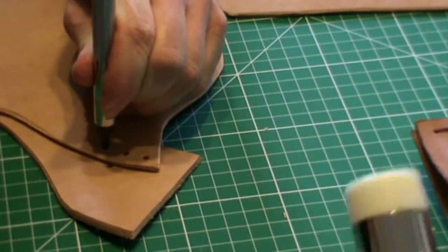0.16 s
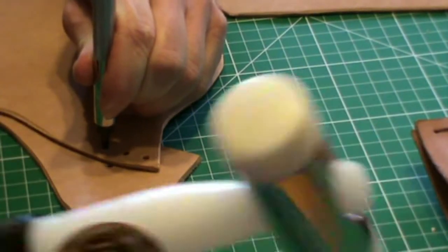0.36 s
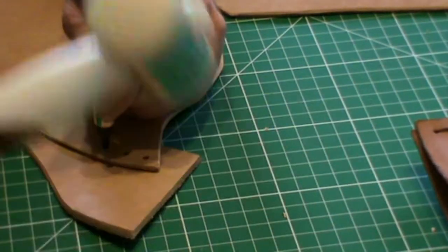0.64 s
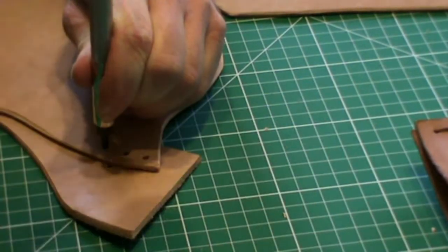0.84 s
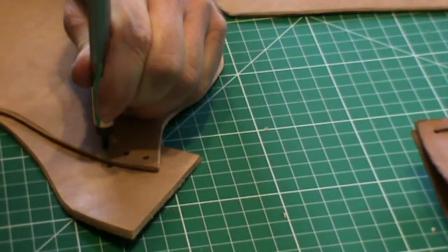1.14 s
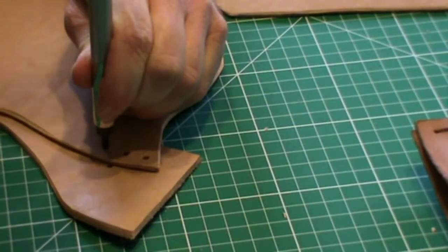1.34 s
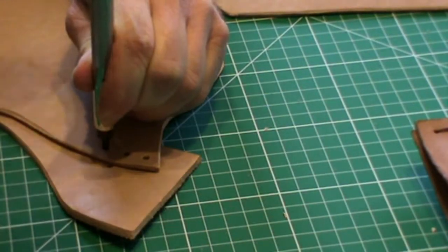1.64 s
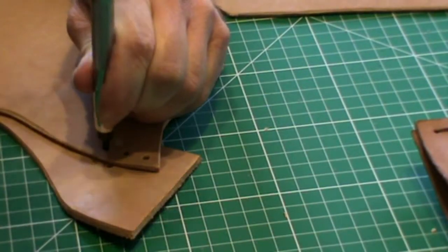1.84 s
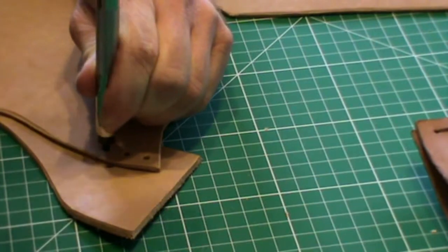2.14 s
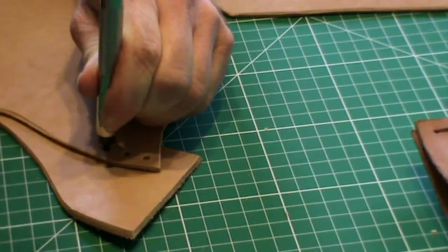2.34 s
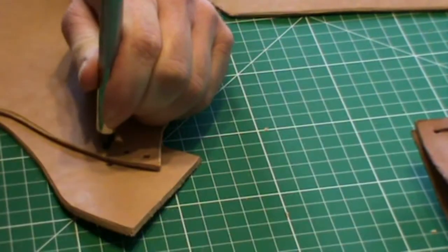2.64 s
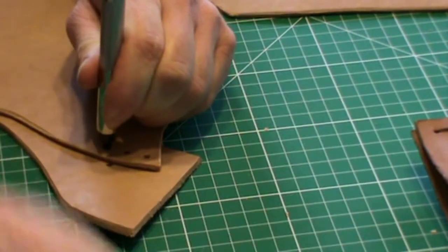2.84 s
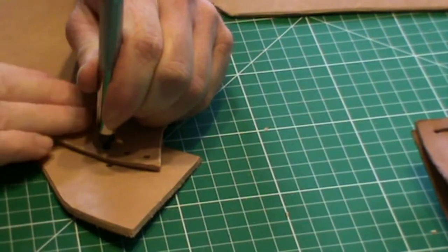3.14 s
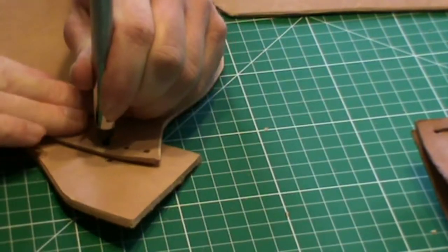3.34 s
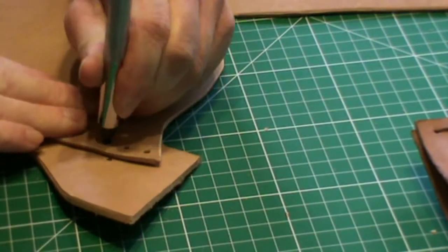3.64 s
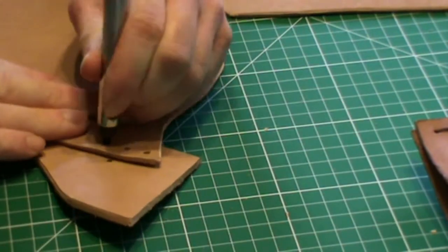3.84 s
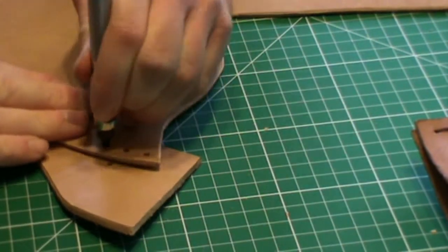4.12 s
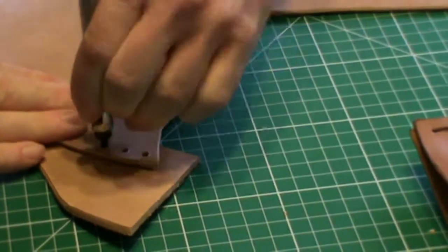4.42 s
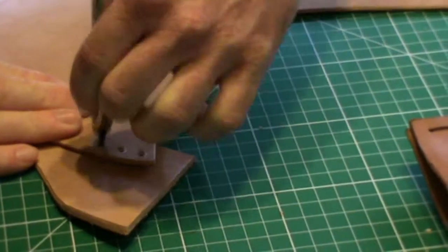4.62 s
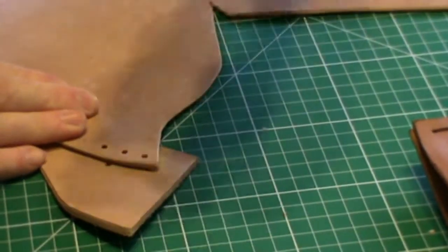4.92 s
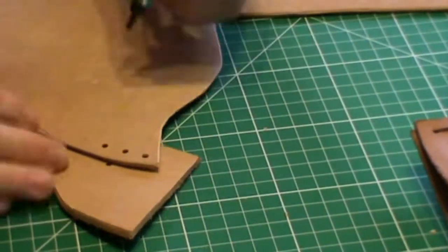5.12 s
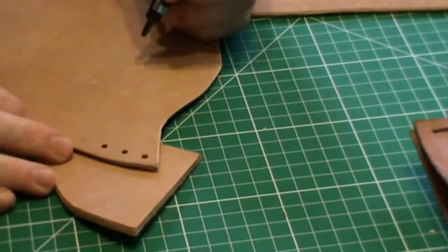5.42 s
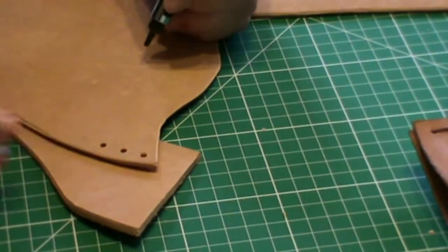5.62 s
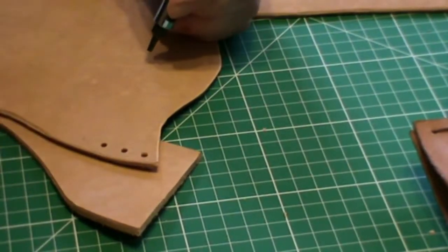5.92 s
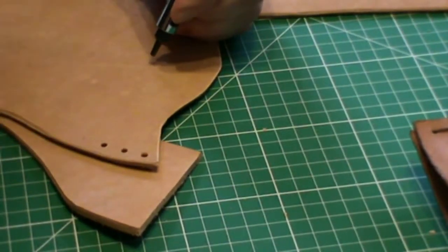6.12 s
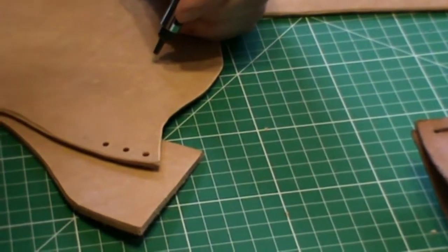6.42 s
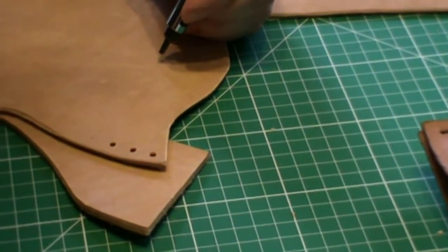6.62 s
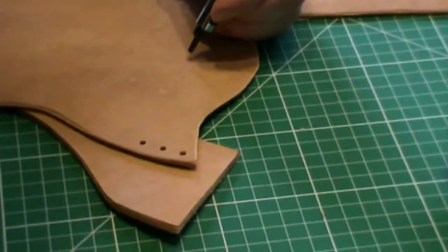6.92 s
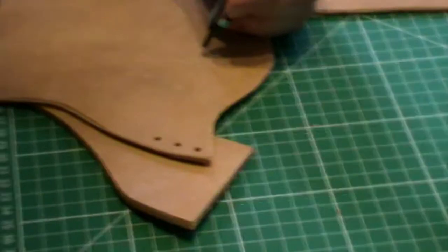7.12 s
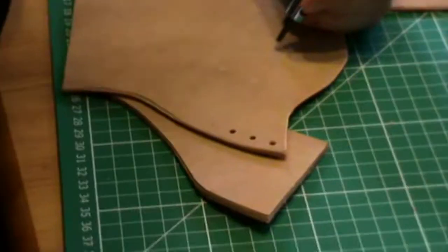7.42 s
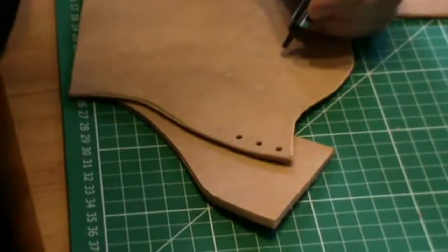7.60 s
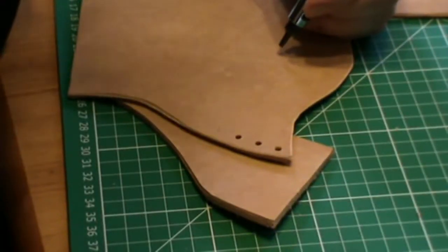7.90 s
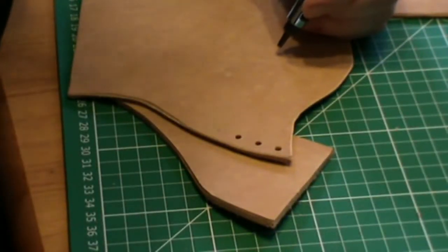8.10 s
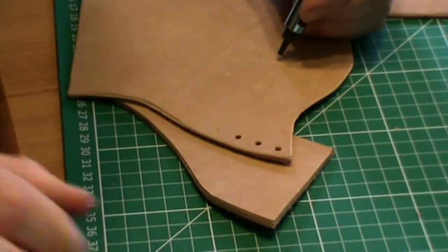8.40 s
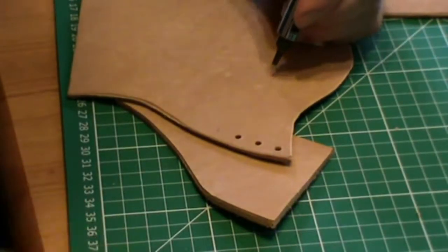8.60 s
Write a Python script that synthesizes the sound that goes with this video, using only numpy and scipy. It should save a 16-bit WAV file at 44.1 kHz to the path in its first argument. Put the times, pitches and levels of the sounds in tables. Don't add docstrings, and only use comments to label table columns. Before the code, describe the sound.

Close to the microphone in a small hard room, a faint scrape and knock lead to three loud, accelerating mallet blows on a steel punch, each a bright crack with a woody bench thump and short tail. The handle knocks down, the punch creaks loose in quick snaps, a steel tool clinks and rings, then a stand bumps, rattles and settles over faint motor hum and hiss.

```python
import sys
import numpy as np
from scipy import signal
from scipy.io import wavfile
from scipy.ndimage import uniform_filter1d, minimum_filter1d

SR = 44100
rng = np.random.default_rng(int(sys.argv[2]) if len(sys.argv) > 2 else 0)


def gain_from_db(level_db):
    decades = np.asarray(level_db, float) / 20
    return 10 ** decades


def store_pcm(level_fs):
    pcm = np.round(np.clip(level_fs, -1, 1) * 32767).astype(np.int16)
    wavfile.write(sys.argv[1], SR, np.atleast_2d(pcm).T)


N = 385864

# (time [s], body and room level [dB], contact tick level [dB], bass level [dB])
HAMMER_BLOWS = [
    (1.4114, -4, 0.5, -7),
    (1.7444, -0.5, 1, -11),
    (2.0286, 0, 8, -10.5),
]
HAMMER_LAID = [
    (2.694, -6, -5, -15),
    (2.768, -2, -7, -19.5),
]
TOOL_DROP = [
    (6.136, -24, -14, -34),
    (6.170, -32.5, -22, -59),
]
BENCH_KNOCKS = [
    (0.084, -40, -70, -70),
    (0.101, -46, -68, -71),
    (1.016, -23, -39, -29.5),
    (1.063, -37.5, -37, -45.5),
    (4.646, -33, -37, -64),
    (6.568, -46, -70, -49),
    (6.647, -36.5, -70, -50),
    (7.766, -54, -44, -76),
    (8.618, -35, -57, -39),
    (8.629, -30, -55, -33),
]
STAND_JOLTS = [(7.118, -14, -45, -28), (7.123, -12, -42, -24), (7.186, -16.5, -60, -35),
               (7.195, -11, -45, -24), (7.216, -11.5, -22, -42), (7.257, -17, -37, -27),
               (7.279, -13.5, -40, -25), (7.300, -15.5, -45, -33), (7.311, -13, -41, -31),
               (7.35, -50, -18, -32), (7.408, -12.5, -23, -45), (7.477, -40, -43, -50),
               (7.66, -36.5, -55, -43)]
FOOT_NUDGES = [
    (6.716, -28, -60, -43),
    (6.752, -22, -55, -43),
    (6.774, -11, -60, -39),
    (6.786, -11, -50, -35),
    (6.812, -23, -50, -44),
    (6.859, -45, -60, -50),
    (7.046, -16, -60, -42),
    (7.057, -13, -60, -43),
]
CATCH_CLICKS = [
    (4.6455, -52, -18, -60),
    (7.056, -60, -53.5, -70),
    (7.112, -60, -70, -80),
    (7.122, -40, -50, -53),
    (7.179, -62, -54, -60),
    (7.194, -39, -48, -54),
]
PUNCH_FLICKS = [
    (4.991, -67, -54, -80),
    (5.004, -78, -58, -80),
    (5.018, -61, -36, -79),
    (5.075, -69, -65, -85),
]
JOINT_TICKS = [
    (6.577, -63, -42, -80),
    (6.778, -56, -34, -78),
    (6.822, -65, -36, -80),
    (6.745, -58, -45, -80),
    (6.7545, -60, -31.5, -80),
    (6.789, -41, -32, -80),
    (6.8345, -65, -25, -80),
    (7.055, -57, -44, -80),
]
PIN_PINGS = [
    (7.054, -63, -48, -80),
    (7.124, -56, -29, -80),
    (7.194, -52, -34, -80),
    (7.217, -66, -29, -78),
    (7.41, -58, -36, -80),
]
CLIP_PLUCKS = [
    (7.1105, -66, -14, -90),
    (7.179, -68, -30, -90),
]
NAIL_TAPS = [
    (8.6148, -51, -23.5, -80),
    (8.628, -58, -32, -80),
]
# (time [s], body and room level [dB], contact tick level [dB])
PUNCH_SNAPS = [(2.343, -48, -49), (2.3544, -50, -54), (2.3636, -49, -53), (2.468, -55, -58),
               (2.52, -61, -67), (2.7834, -39, -40), (4.1728, -32, -43), (4.1763, -9, -23),
               (4.2292, -11, -23.5), (4.255, -37, -40), (4.2644, -10, -22.5), (4.2858, -6.5, -23),
               (4.3011, -12, -22), (4.3149, -18, -23.5), (4.329, -10.5, -24.5), (4.343, -12, -24.5),
               (4.4125, -10.5, -26.5), (4.4225, -34, -42), (4.4313, -11.5, -25.5), (4.4475, -20, -30),
               (4.4891, -13, -27), (4.522, -13.5, -29.5), (4.531, -31, -42), (4.5383, -17, -33),
               (4.552, -25, -35), (4.5688, -14.5, -34), (4.579, -31, -38), (4.585, -19, -41.5),
               (4.6087, -20, -30), (4.6318, -35, -38.5), (4.99, -32, -55), (5.018, -34, -44),
               (5.125, -29, -53.5), (5.534, -29, -52)]

# (start [s], peak [s], end [s], peak level [dB], end level [dB])
HEAD_SCRAPES = [
    (.228, .238, 0.27, -54, -74),
    (.28, .33, 0.74, -49.5, -61),
]
HEAD_SINGING = [
    (.28, .38, 0.62, -59, -72),
]
MAT_SLIDES = [
    (3.95, 4.17, 4.8, -35, -49),
    (4.69, 4.7, 30, -43.5, -69),
    (6.44, 6.45, 8.9, -51, -68),
    (7.15, 7.23, 7.5, -17, -38),
]
SLEEVE_BRUSHES = [
    (5.1, 5.13, 5.2, -65, -71),
    (5.545, 5.575, 5.1, -58, -56),
]
STAND_ROLL = [
    (7.52, 7.76, 8.34, -54, -61),
]
STAND_CREAK = [
    (8.11, 8.13, 8.47, -51, -65),
]
MOTOR_LOUDER = [
    (7.5, 7.6, 8.6, -20, -20),
]

# (frequency [Hz], level [dB])
BENCH_COLOURS = [
    [(40, -25), (69, -11), (96, -13), (194, -3), (329, -5), (918, -1.5), (1150, -4.5), (1630, 2),
     (2570, -11), (3050, -6.5), (3700, -24.5), (5200, -27.5), (10200, -34), (12500, -30.5), (16000, -104)],
    [(40, -30), (69, 0.5), (91, -22), (194, 6), (256, -1), (337, 3.5), (1180, -3.5), (1630, 3), (2500, -19),
     (3300, -12), (5310, -32), (10400, -36.5), (13100, -41), (16000, -106)],
    [(40, -32.5), (147, -4.5), (237, -13), (392, -4.5), (444, -10), (600, -4.5), (1210, -8), (1630, -5.5),
     (2500, -20.5), (3300, -21.5), (5580, -39.5), (9940, -32.5), (13400, -45), (16000, -106)],
]
HANDLE_COLOURS = [
    [(40, -52), (330, -21.5), (500, -10), (630, 1), (751, -2.5), (1100, -9.5), (1750, -52), (6020, -51.5),
     (14800, -73), (16000, -76)],
    [(40, -61.5), (81, -32), (159, 3.5), (243, -15.5), (320, 1.5), (556, -10.5), (615, 2.5), (733, -3),
     (810, 1), (1270, -6), (2000, -16), (3140, -25.5), (3930, -40.5), (8990, -42.5), (16000, -65)],
]
WOOD_COLOURS = [
    [(40, -39), (97, -26), (241, -23), (351, 2.5), (469, -17), (639, -3.5), (746, -8), (8000, -61),
     (10400, -86)],
    [(30, -38.5), (74, -29.5), (110, -1.5), (377, -9), (473, -6), (560, -12), (930, -4.5), (1130, -27.5),
     (1460, -25.5), (12000, -74), (15600, -80)],
    [(40, -10), (103, 6), (243, -9.5), (339, 4), (650, -6), (854, -6), (5070, -29.5), (6000, -53),
     (7800, -48), (13200, -120)],
    [(40, -34), (136, -15), (306, -12.5), (372, -1.5), (476, -8), (899, -12.5), (2070, -28.5),
     (5130, -37.5), (14000, -52)],
]
LEATHER_COLOUR = [(59, -55), (100, -11), (224, 0.5), (302, -19), (481, -4.5), (872, -5), (1800, 4.5),
                  (3780, -3.5), (7290, -0.5), (16000, -4)]
STEEL_COLOUR = [(35, -47), (60, -26), (274, -34), (408, -17), (527, -35), (803, -14), (1090, -18),
                (1250, -8), (1740, -19.5), (3120, -7), (3950, -10), (4640, 0.5), (5210, -8), (12400, -22.5),
                (16000, -63)]
LEGS_COLOUR = [(25, -9), (92, -6), (363, -2), (545, -15), (863, -3), (1440, -13), (1700, -10), (5140, -18),
               (7510, -16.5), (14400, -34.5), (16000, -46)]
FEET_COLOUR = [(30, -1), (172, 4.5), (217, -5.5), (383, -3), (495, -11), (786, -15), (965, -9), (2140, -21),
               (14000, -44)]
CATCH_COLOUR = [(300, -15), (900, 0), (1900, -20), (3500, -4), (12000, -34)]
# (frequency [Hz], level [dB])
PLAIN_TICK = [(500, -25), (2000, -14), (4500, 0.5), (7500, -0.5), (12000, 2), (14000, 6), (16000, -12)]
FACE_TICK = [(290, -43.5), (500, 7.5), (1640, -7), (2390, -9), (3920, -2), (4940, -6), (5880, -27),
             (7980, -11.5), (11100, -12), (13400, -27), (16000, -56)]
HANDLE_TICK = [(500, -8), (1500, 1), (3400, -5), (4300, -8.5), (7000, -8.5), (11000, -7), (14000, -16),
               (16000, -40.5)]
JOINT_TICK = [(500, -30), (1600, 5), (2800, 5.5), (4200, -6), (6500, -6.5), (12000, -21), (16000, -35)]
NAIL_TICK = [(1500, -20), (4000, -4), (5500, -7), (8500, -6), (12000, -10), (14500, -25), (16000, -40)]

# (frequency [Hz], level [dB], decay by 60 dB [s])
BENCH_RING = [(115.6, -24.5, 0.31), (156.4, -14.5, 0.28), (201.9, -17, 0.36), (428, -25, 0.25),
              (664, -18, 0.14), (1457, -49, 0.05), (1625, -25.5, 0.044), (3040, -20.5, 0.0054)]
PLANK_RING = [(109.4, -31.5, 0.28), (334, -23, 0.11), (760, -30, .1), (306, -24.5, 0.098), (400, -25, 0.16),
              (522, -22, 0.17), (850, -28, 0.087), (922, -19, 0.09), (1055, -16.5, 0.057),
              (1297, -17.5, 0.091), (1494, -39, 0.13), (1680, -28, .06), (2120, -23, .04),
              (3280, -30, .025), (3900, -33, .03)]
HAMMER_RING = [(3220, -33, 0.0232), (4380, -31.5, 0.013), (9800, -33, 0.012), (3700, -28, .02),
               (4800, -44, 0.021), (6380, -37.5, 0.0086), (8230, -40.5, 0.0088), (10700, -57, 0.012)]
HANDLE_RING = [(353, -19.5, 0.032), (525, -10, 0.042), (637, -10.5, 0.059), (810, -23, 0.071),
               (960, -18, 0.055), (1078, -16, 0.08), (1234, -20, 0.054)]
PUNCH_RING = [(1585, -9.5, 0.048), (1770, -11, 0.049), (4670, -2.5, 0.018), (8100, -2, 0.0056),
              (12150, 1, 0.0042), (13600, -2, 0.0025)]
STEEL_RING = [(826, -18, 0.063), (2800, -26, .06), (3105, -13.5, 0.2), (3070, -25, .08), (4160, -29, 0.067),
              (4370, -18, 0.047), (4650, -14, 0.089), (4696, -13, 0.42), (4660, -18, 0.11),
              (5900, -20, 0.05), (6500, -18, .04), (7150, -12.5, 0.023), (7800, -13, 0.024),
              (12000, -16.5, 0.0046)]
LEG_RING = [(67, -24, 0.18), (103.6, -11, 0.076), (184, -7.5, 0.043), (831, -8.5, 0.039),
            (1830, -41, 0.018), (2150, -30, 0.022), (2780, -22, 0.018), (9050, -27, 0.064)]
CATCH_RING = [(1850, -1, 0.025), (2110, -9, 0.028), (2900, -19, 0.016)]
FLICK_RING = [(785, -19, .012), (1570, -1, 0.01), (1790, 3.5, 0.013), (3200, -12, 0.003)]
PIN_RING = [(830, 6, 0.036), (1820, -3, 0.041), (2120, 5, .035), (2730, -16, 0.023), (7100, -12.5, 0.014),
            (9100, -28, .06)]
CLIP_RING = [(1850, -2, .05), (2150, -7, .03)]
# (frequency [Hz], width [Hz], level [dB])
HEAD_RESONANCES = [(1220, 290, -4), (1580, 220, 4), (2205, 120, 5), (3200, 290, 0), (4400, 120, -9)]

# (frequency [Hz], decay by 60 dB [s])
TAIL_DECAY = [(40, 0.058), (120, 0.6), (400, 0.5), (1100, 0.5), (3000, 0.53), (7000, 0.48), (12500, 0.33),
              (14000, 0.26), (15800, 0.18)]
# (frequency [Hz], likeness [0 to 1])
ROOM_LIKENESS = [(30, 0.6), (70, 1), (150, 0.96), (380, 0.65), (950, 0.12), (2380, 0.2), (5980, 0.22),
                 (15000, 0.83)]
# (frequency [Hz], level [dB])
ROOM_LEAN = [(60, -0.5), (180, 0), (550, -2), (1650, -3.5), (4970, -1), (15000, 2.5)]
# (frequency [Hz], level [dB])
HISS_COLOUR = [(25, 8), (45, -12.5), (149, -3), (242, -7.5), (451, -6), (545, -4), (695, -7), (962, -2.5),
               (1160, -8.5), (1370, -7), (2220, -8), (3820, -16), (16000, -23.5)]
# (frequency [Hz], likeness [0 to 1])
HISS_LIKENESS = [(30, 0.84), (70, 0.77), (180, 0.99), (550, 0.48), (1650, -0.0), (4970, 0.12),
                 (15000, 0.88)]
# (multiple of the turn rate, level [dB])
MOTOR_HUM = [(4, -69), (5, -67), (6, -69.5), (7, -70), (8, -68), (9, -75), (10, -68), (11, -65), (12, -67),
             (13, -71.5), (104, -81)]


def evened(x):
    return x / np.sqrt(np.mean(x ** 2) + 1e-20)


def read(points, hz):
    f, value = np.transpose(points)
    return np.interp(np.log(hz + 1), np.log(f + 1), value)


def noise(size, likeness, db, frame=512):
    hz = np.fft.rfftfreq(frame, 1 / SR)[:, None]
    t = np.arange(size * 4 // frame + 5) * frame / 4 / SR
    a, b, c, d = rng.standard_normal((len(t), len(hz), 4)).T
    alike = np.clip(read(likeness, hz), -1, 1)
    left = a + 1j * b
    right = alike * left + np.sqrt(1 - alike ** 2) * (c + 1j * d)
    bins = np.array([left, right]) * gain_from_db(db(hz, t))
    return signal.istft(bins, nperseg=frame, noverlap=frame * 3 // 4)[1][:, :size]


def click(db, size=4096):
    hz = abs(np.fft.fftfreq(size, 1 / SR))
    log_gain = np.log(gain_from_db(np.maximum(db(hz), -100)))
    phase = -signal.hilbert(log_gain).imag
    pulse = np.fft.ifft(np.exp(log_gain + 1j * phase)).real[:size // 2]
    return pulse / np.linalg.norm(pulse)


def resonate(x, hz, width_hz):
    return signal.lfilter(*signal.iirpeak(hz, hz / width_hz, SR), x)


def sides(db):
    return gain_from_db(np.array([[db / 2], [-db / 2]]))


def thinned(x, hz):
    return signal.sosfilt(signal.butter(2, hz, "high", fs=SR, output="sos"), x)


def level(rows):
    t = np.arange(N) / SR
    swell_db = 15.5
    gain = 0
    for start, peak, end, db, end_db in rows:
        gain = gain + gain_from_db(np.interp(t, (start, peak, end), (db - swell_db, db, end_db), -150, -150))
    return gain


def ringing(modes, scatter):
    t = np.arange(SR // 2) / SR
    out = np.zeros(len(t))
    for hz, db, t60 in modes:
        detune, strength_db = scatter * rng.uniform(-1, 1, 2) * [.012, 5]
        ring = gain_from_db(-60 * t / t60) * np.sin(2 * np.pi * hz * (1 + detune) * t)
        out += gain_from_db(db + strength_db) * ring / np.linalg.norm(ring)
    return out


def body_thud(colour, pitch, bass_lift_db, band_count):
    bands_db = 2.2 * rng.standard_normal(band_count)
    bands_hz = np.linspace(0, SR / 2, band_count)

    def db(hz):
        bass = bass_lift_db / (1 + (hz / 170) ** 4)
        rumble_cut = 14 / (1 + (hz / 60) ** 4)
        return read(colour, hz / pitch) + np.interp(hz, bands_hz, bands_db) + bass - rumble_cut

    return click(db)


def room_echoes(rise_s, near_db, near_s):
    t = np.arange(SR * 3 // 5) / SR

    def tail_db(hz, u):
        return -60 * u / read(TAIL_DECAY, hz) + np.multiply.outer([.5, -.5], read(ROOM_LEAN, hz))

    echoes = noise(len(t), ROOM_LIKENESS, tail_db)
    echoes /= np.sqrt(np.mean(echoes[:, :2000] ** 2))
    echoes += gain_from_db(near_db) * np.exp(-t / near_s) * rng.standard_normal(len(t))
    return echoes * (1 - np.exp(-t / rise_s)) ** 2


def contact_tick(colour, pitch, fade_s, rise_s):
    t = np.arange(301) / SR
    grit = rng.standard_normal(300) * np.exp(-t[:300] / fade_s) * (1 - np.exp(-t[1:] / rise_s))
    tick = np.convolve(grit, click(lambda hz: read(colour, hz / pitch), size=256))
    return tick / abs(tick).max()


def strikes(rows, colours, modes, tick_colour=PLAIN_TICK, body_db=0., tick_db=0., shelf_db=14.5,
            rise_s=.004, near_db=6., near_s=0.009, scatter=1, wet_db=0., tick_ring_db=-48.0,
            tick_s=0.00057, pitches=1, pans_db=0, lag_size=40, tick_rise_s=0.00002, band_count=90):
    out = np.zeros((2, N + SR))
    pitches = np.resize(pitches, len(rows))
    pans_db = np.resize(pans_db, len(rows))
    for row, colour, pitch, pan_db in zip(rows, colours * len(rows), pitches, pans_db):
        s, db, contact_db, bass_db = row
        rung = ringing(modes, scatter)
        thud = body_thud(colour, pitch, bass_db - db + shelf_db, band_count)
        pulse = np.pad(thud, (0, len(rung) - len(thud))) + gain_from_db(wet_db) * rung
        echoes = room_echoes(rise_s, near_db, near_s)
        size = echoes.shape[1]
        sound = gain_from_db(db + body_db) * signal.fftconvolve(pulse[None], echoes, axes=1)[:, :size]
        tick = contact_tick(tick_colour, pitch, tick_s, tick_rise_s)
        sound[:, :len(tick)] += gain_from_db(contact_db + tick_db) * tick
        sound[:, lag_size:lag_size + len(rung)] += gain_from_db(contact_db + tick_ring_db) * rung
        out[:, round((s + .0008) * SR):][:, :size] += sound * sides(pan_db)
    return out[:, :N]


def rubbing():
    rough = gain_from_db(np.minimum(2.2 * evened(uniform_filter1d(rng.standard_normal(N), 500)), 2.5))

    def db(hz, t):
        return read(LEGS_COLOUR, hz) + 0.086 * np.log2(hz / 1000 + .02) + 0 * t

    return evened(noise(N, ROOM_LIKENESS, db) * rough)


def camera():
    t = np.arange(N) / SR
    motor_hz, hiss_db, gain_db = 49.64, -58.5, 2.5
    hiss = evened(noise(N, HISS_LIKENESS, lambda hz, u: read(HISS_COLOUR, hz) + 0 * u, frame=2048))
    hum = 0
    for multiple, db in MOTOR_HUM:
        hum = hum + gain_from_db(db + gain_db) * np.sin(2 * np.pi * (multiple * motor_hz * t + rng.random()))
    pawl = np.diff(np.floor(t * motor_hz / 2 + 0.2), prepend=0) * gain_from_db(1.8 * rng.standard_normal(N))
    pawl_ring = resonate(resonate(pawl, 2030, 247), 2030, 247)
    return gain_from_db(hiss_db + gain_db) * hiss + hum + (gain_from_db(-24.5) + level(MOTOR_LOUDER)) * pawl_ring


def bench_knocks():
    woods = [WOOD_COLOURS[k] for k in (0, 0, 1, 1, 2, 1, 2, 2, 3, 3)]
    return strikes(BENCH_KNOCKS, woods, BENCH_RING[:3], FACE_TICK, body_db=-7.0, tick_db=2.5,
                   rise_s=0.0013, near_s=0.055, wet_db=-1.5, pitches=0.96, pans_db=-1.5)


def lifted_head(rub):
    head = 0.29 * rub
    for hz, width_hz, db in HEAD_RESONANCES:
        head = head + gain_from_db(db) * resonate(rub, hz, width_hz)
    singing = evened(resonate(rub, 4360, 130))
    return evened(head) * level(HEAD_SCRAPES) + singing * level(HEAD_SINGING)


def hammer_blows():
    return strikes(HAMMER_BLOWS, BENCH_COLOURS, BENCH_RING + PLANK_RING + HAMMER_RING, FACE_TICK,
                   rise_s=0.0011, tick_s=0.00058, tick_rise_s=0.0005, tick_ring_db=-25.0,
                   scatter=0.27, near_db=-6.5, near_s=0.0062, band_count=400, pans_db=-0.3)


def punch_snaps():
    bass_db = -47
    pitches = 0.96 + .007 * np.transpose(PUNCH_SNAPS)[2]
    snaps = strikes([(*row, bass_db) for row in PUNCH_SNAPS], [LEATHER_COLOUR], PUNCH_RING,
                    body_db=-28.0, tick_db=12.5, shelf_db=22.0, rise_s=0.0015, near_db=9.0,
                    near_s=0.0032, wet_db=-14.0, tick_ring_db=13.5, scatter=1 / 3, tick_s=0.00025,
                    pitches=pitches, pans_db=-0.1, lag_size=8)
    return thinned(snaps, hz=110)


def laid_hammer():
    laid = strikes(HAMMER_LAID, HANDLE_COLOURS, HANDLE_RING, HANDLE_TICK, tick_s=0.0003,
                   rise_s=0.00017, near_db=5.0, near_s=0.029, pans_db=-0.8)
    return thinned(laid, hz=130)


def mat_slides(rub):
    return gain_from_db(-16.5) * rub * level(MAT_SLIDES)


def catch_clicks():
    return strikes(CATCH_CLICKS, [CATCH_COLOUR], CATCH_RING, FACE_TICK, body_db=-5.5, rise_s=0.00086,
                   near_db=15.5, near_s=0.0086, scatter=0.27, wet_db=4.5,
                   pitches=[0.71, 0.92, 0.88, 0.88, 0.45, 0.94])


def punch_flicks():
    return strikes(PUNCH_FLICKS, [CATCH_COLOUR], FLICK_RING, FACE_TICK, rise_s=0.001, near_db=10.0,
                   near_s=0.023, scatter=0.22, pitches=0.96)


def sleeve_brushes(rub):
    cloth = resonate(rub, 10000, 3000) + 1.6 * resonate(rub, 12000, 3000)
    return evened(cloth) * level(SLEEVE_BRUSHES)


def dropped_tool():
    return strikes(TOOL_DROP, [STEEL_COLOUR], STEEL_RING, FACE_TICK, rise_s=0.00014, near_db=13.5,
                   near_s=0.0011, scatter=0, tick_s=0.0014, tick_ring_db=21.5, pans_db=0.3)


def joint_ticks():
    return strikes(JOINT_TICKS, [JOINT_TICK], [], JOINT_TICK, rise_s=0.00085, near_db=13.0,
                   near_s=0.0043, tick_s=0.0017)


def foot_nudges():
    return strikes(FOOT_NUDGES, [FEET_COLOUR], LEG_RING[:4], FACE_TICK, body_db=-31.0, tick_db=-4.0,
                   shelf_db=18.0, rise_s=0.0013, near_db=10.0, near_s=0.016, wet_db=1.5, pans_db=-1.0)


def pin_pings():
    return strikes(PIN_PINGS, [CATCH_COLOUR], PIN_RING, JOINT_TICK, rise_s=0.00058, near_db=18.0,
                   near_s=0.0077, scatter=.3, wet_db=4.0, tick_ring_db=18.0, lag_size=8)


def clip_plucks():
    return strikes(CLIP_PLUCKS, [CATCH_COLOUR], CLIP_RING, JOINT_TICK, tick_db=-20.0, tick_ring_db=8.0,
                   wet_db=15.0, near_db=12.0, near_s=0.008, scatter=0, lag_size=8)


def stand_jolts():
    return strikes(STAND_JOLTS, [LEGS_COLOUR], LEG_RING, FACE_TICK, body_db=-21.0, tick_db=-14.0,
                   shelf_db=18.5, rise_s=0.00059, near_db=10.0, near_s=0.012, tick_s=0.0024)


def stand_roll(rub):
    hollow = resonate(rub, 930, 230) + 1.1 * resonate(rub, 490, 250)
    return evened(hollow) * level(STAND_ROLL)


def stand_creak():
    creak_hz, sag_hz_per_s = 244, 32
    since_peak = np.arange(N) / SR - STAND_CREAK[0][1]
    turns = np.cumsum(creak_hz - sag_hz_per_s * since_peak) / SR
    flutter = 1 + 0.42 * evened(uniform_filter1d(rng.standard_normal(N), 600))
    return level(STAND_CREAK) * np.sin(2 * np.pi * turns) * flutter


def nail_taps():
    return strikes(NAIL_TAPS, [NAIL_TICK], [], NAIL_TICK, rise_s=0.001, near_db=2.0, near_s=0.006,
                   tick_s=0.00061, pitches=[1.01, 0.8])


def scene():
    rub = rubbing()
    work = bench_knocks() + hammer_blows() + punch_snaps() + laid_hammer() + punch_flicks()
    work += dropped_tool() + nail_taps()
    stand = catch_clicks() + joint_ticks() + foot_nudges() + pin_pings() + clip_plucks() + stand_jolts()
    friction = lifted_head(rub) + mat_slides(rub) + sleeve_brushes(rub) + stand_roll(rub)
    return camera() + work + stand + friction + stand_creak()


def band_limit(x):
    return signal.sosfilt(signal.butter(12, 16990, fs=SR, output="sos"), x)


def record(dry):
    lookahead, threshold_db, release_db_per_s, recovery_s = 60, -12.5, 500., 3.6
    power_db = 10 * np.log10(abs(uniform_filter1d((dry ** 2).mean(0), 180)) + 1e-12)
    fall_db = np.arange(N) * release_db_per_s / SR
    held_db = np.maximum.accumulate(power_db + fall_db) - fall_db
    over_db = np.maximum(held_db - threshold_db, 0)
    over_db = -minimum_filter1d(-over_db, size=lookahead * 2 + 1)
    memory = np.exp(-1 / SR / recovery_s)
    dip_db = 0.82 * signal.lfilter([1 - memory], [1, -memory], over_db)
    held = dry / gain_from_db(0.84 * uniform_filter1d(over_db, 120) + dip_db)
    held = thinned(held, hz=52)
    held = signal.oaconvolve(held, signal.firwin(511, 15950, fs=SR)[None], "same")
    finished = np.clip(held, -1, 1)
    return band_limit(finished)


dry = scene()
out = record(dry)
store_pcm(out)
```